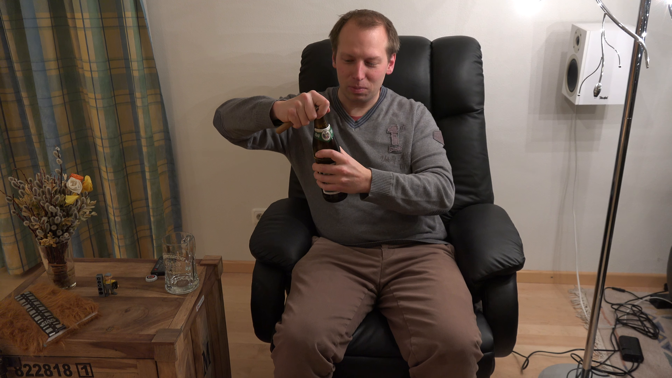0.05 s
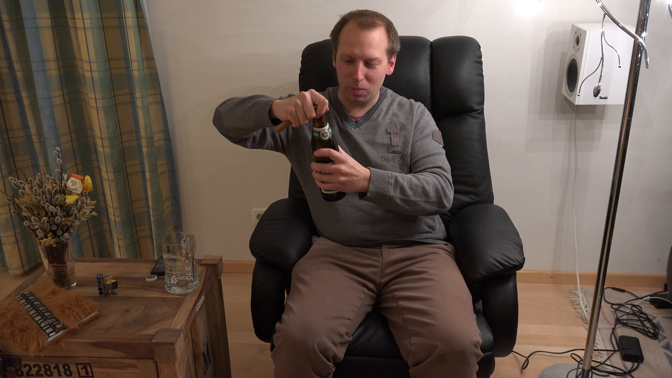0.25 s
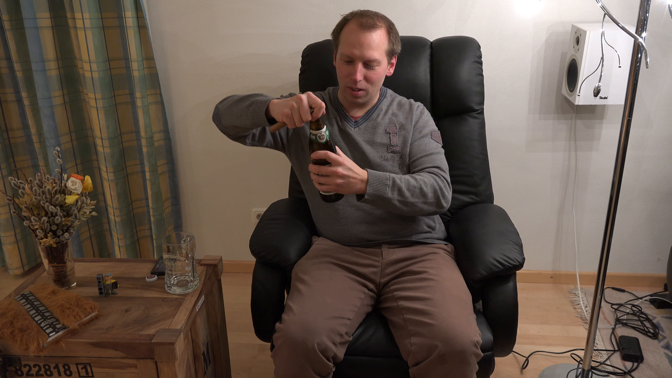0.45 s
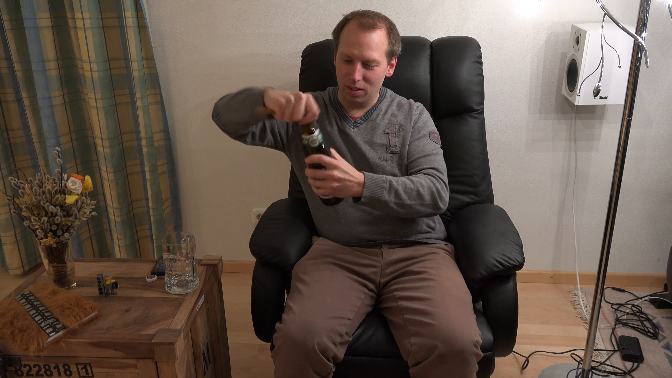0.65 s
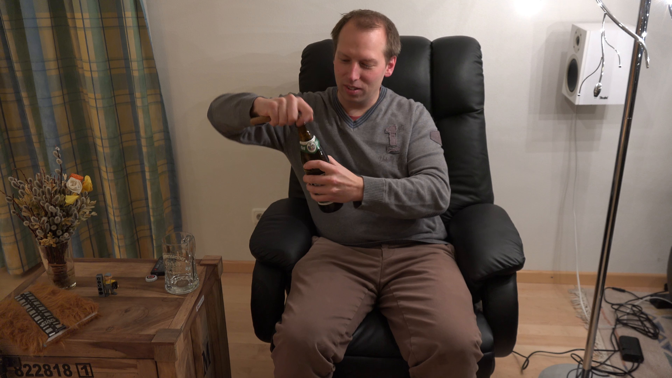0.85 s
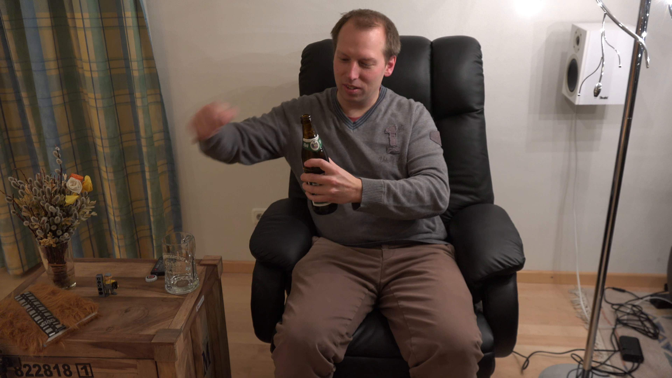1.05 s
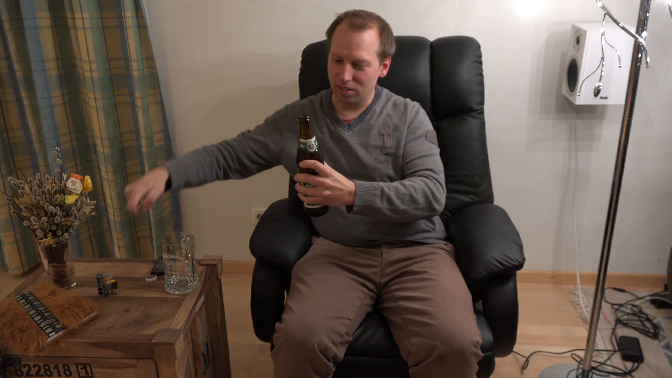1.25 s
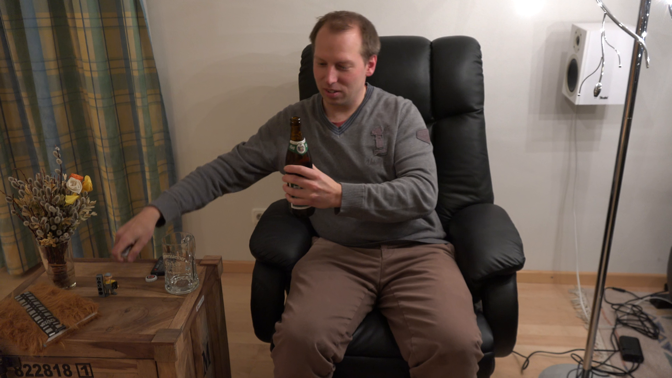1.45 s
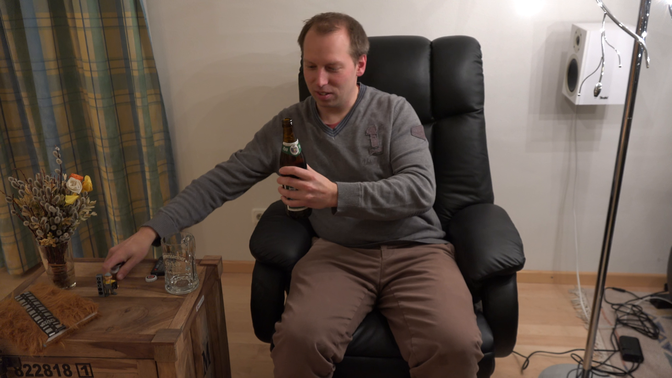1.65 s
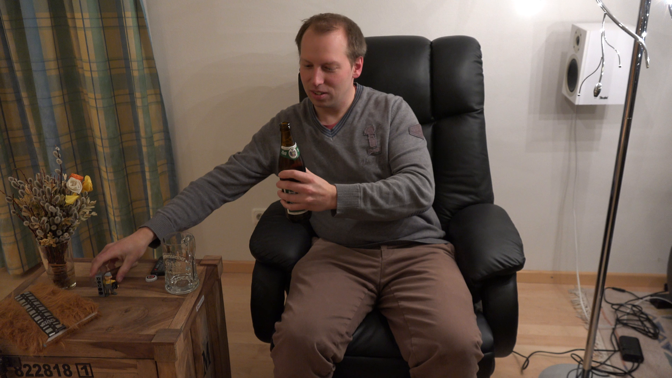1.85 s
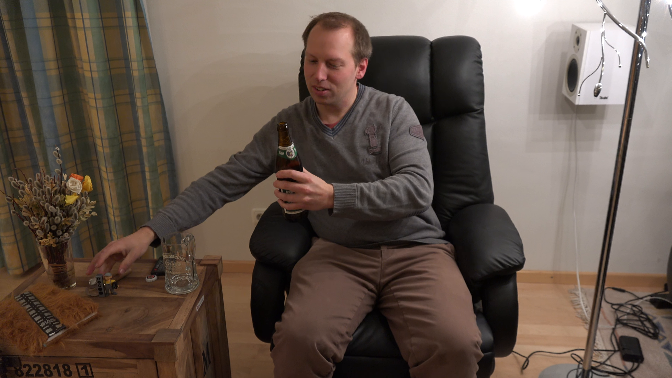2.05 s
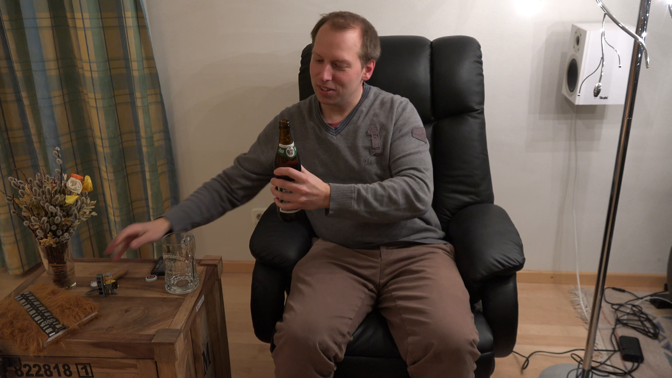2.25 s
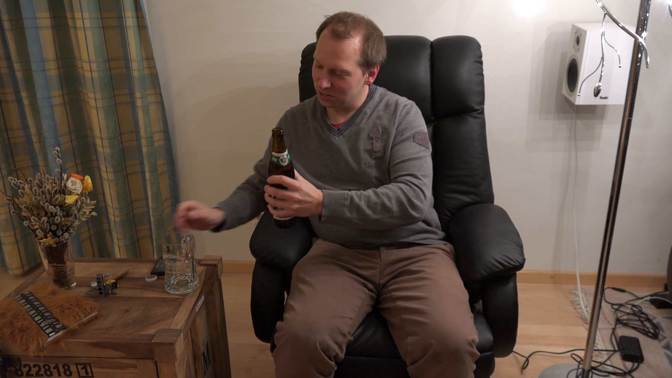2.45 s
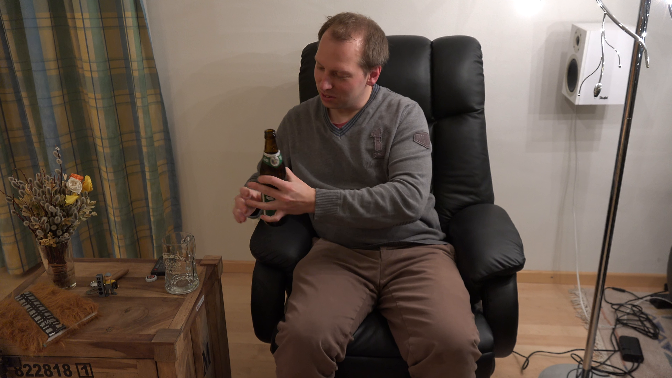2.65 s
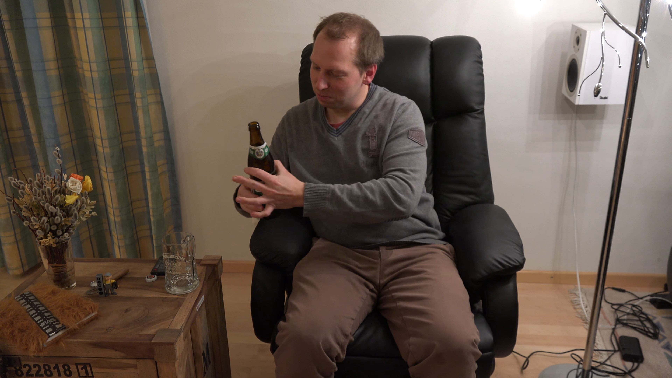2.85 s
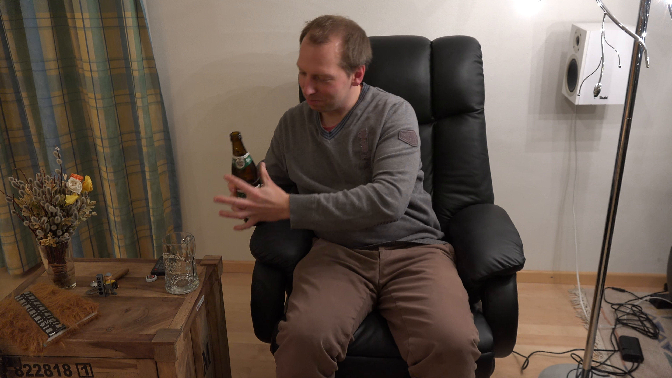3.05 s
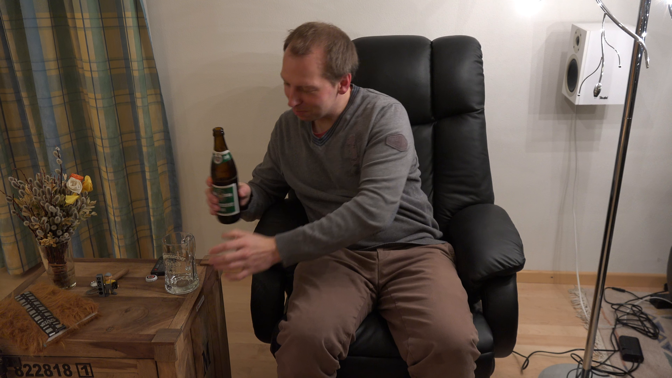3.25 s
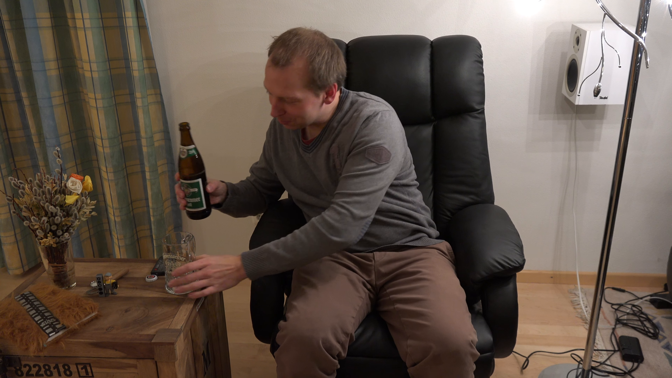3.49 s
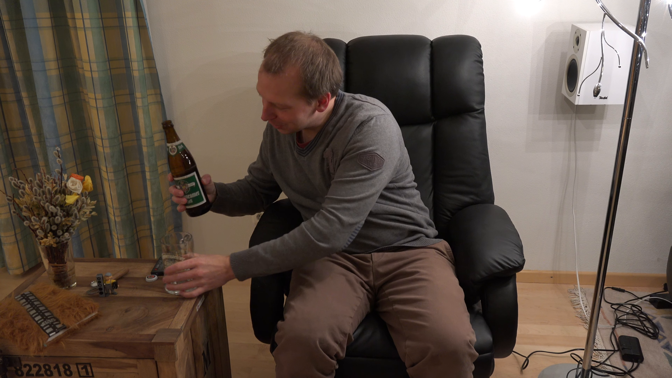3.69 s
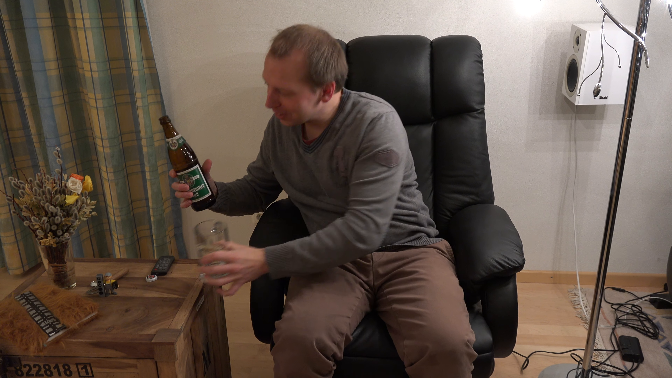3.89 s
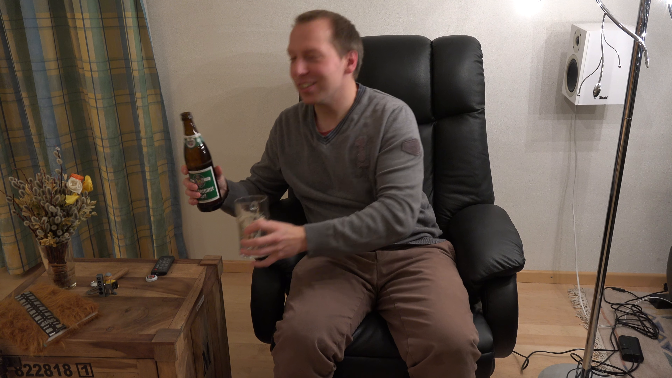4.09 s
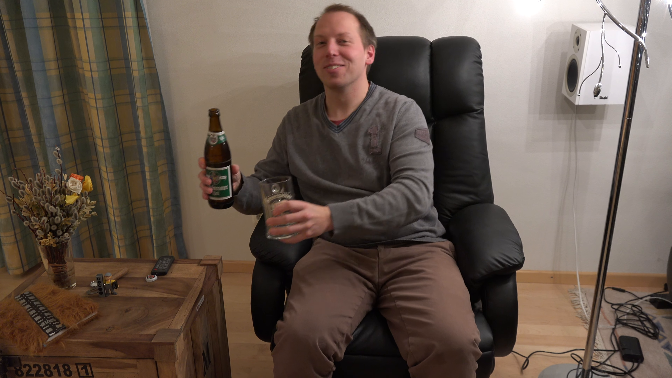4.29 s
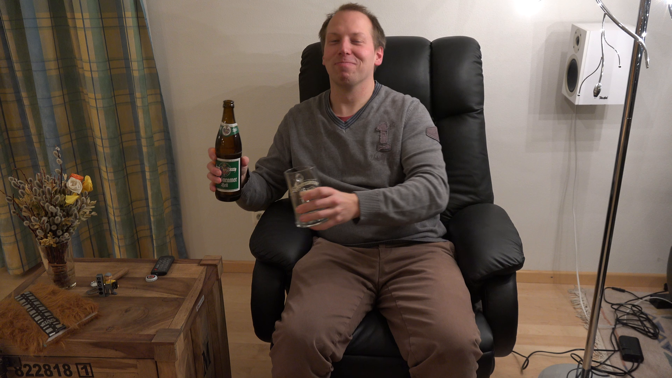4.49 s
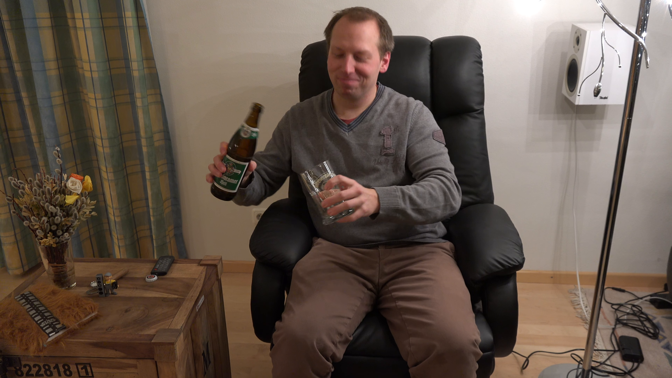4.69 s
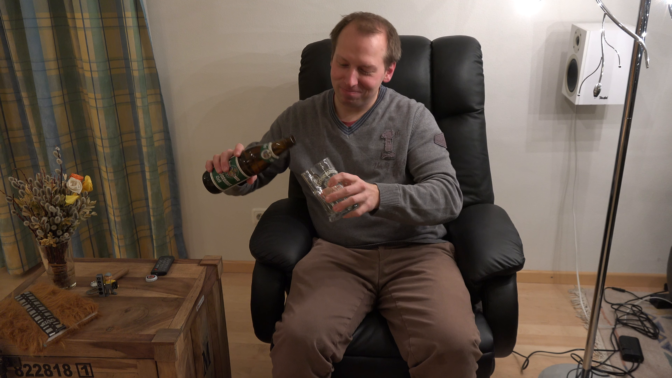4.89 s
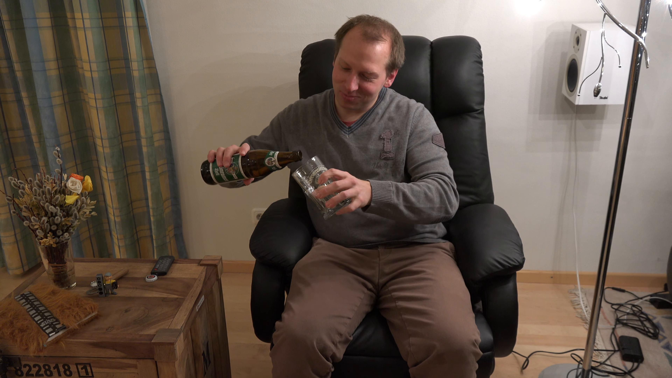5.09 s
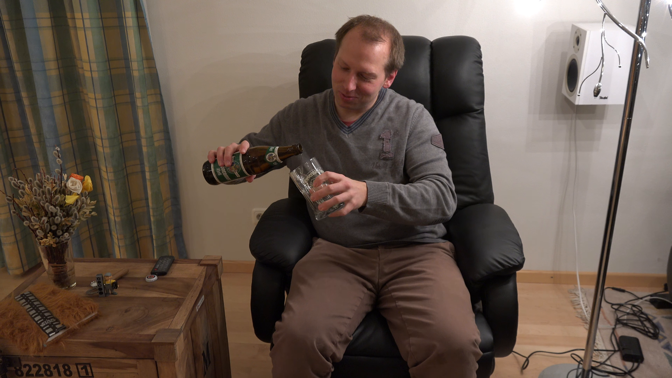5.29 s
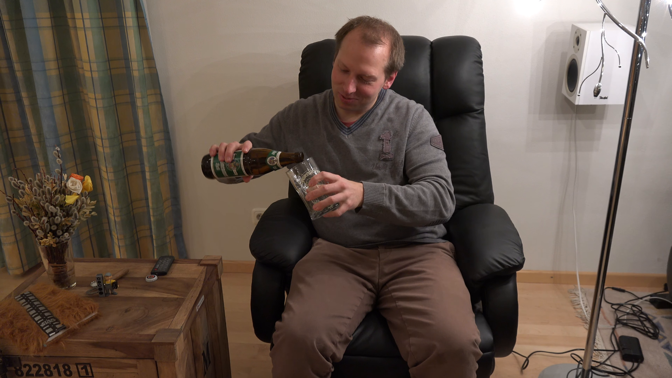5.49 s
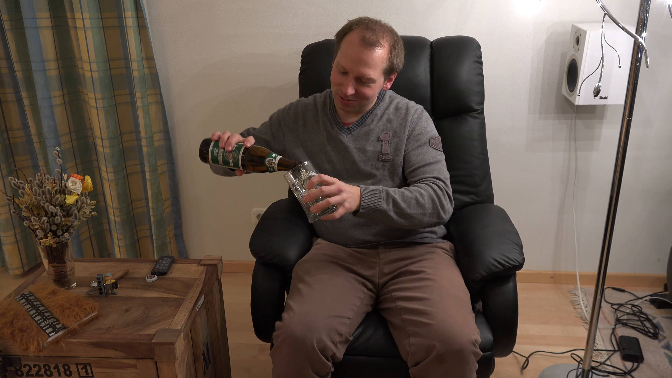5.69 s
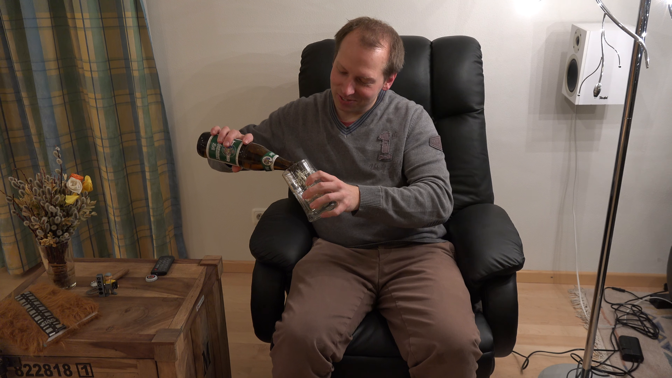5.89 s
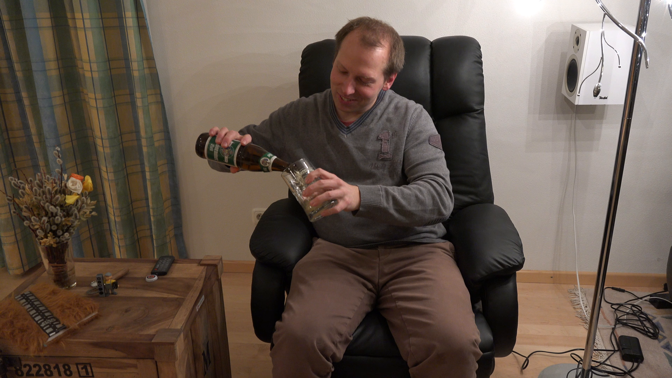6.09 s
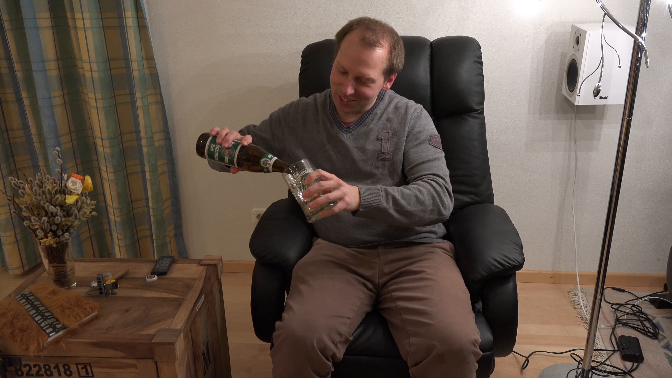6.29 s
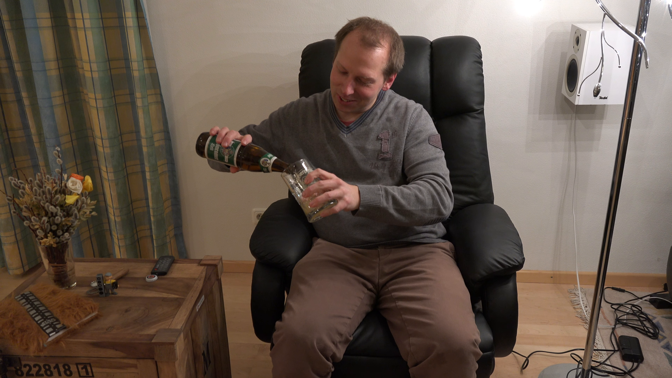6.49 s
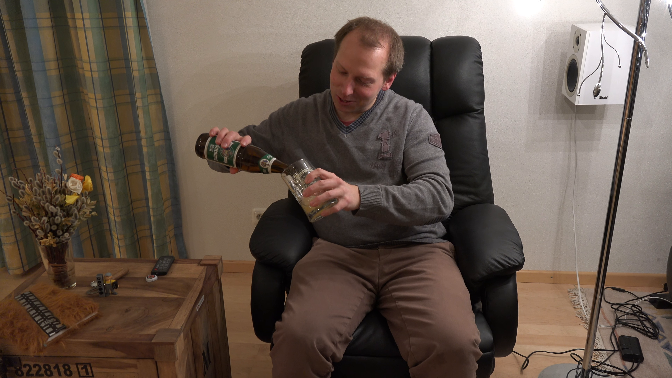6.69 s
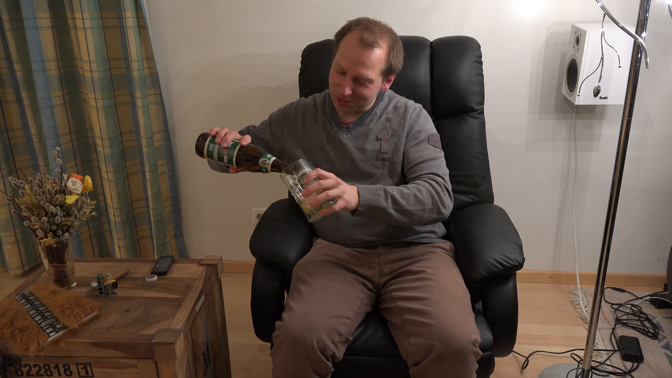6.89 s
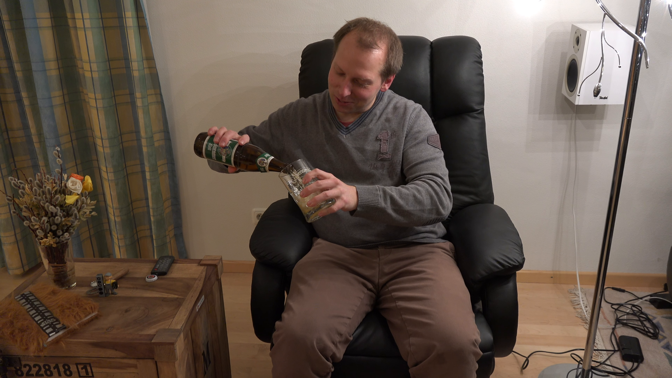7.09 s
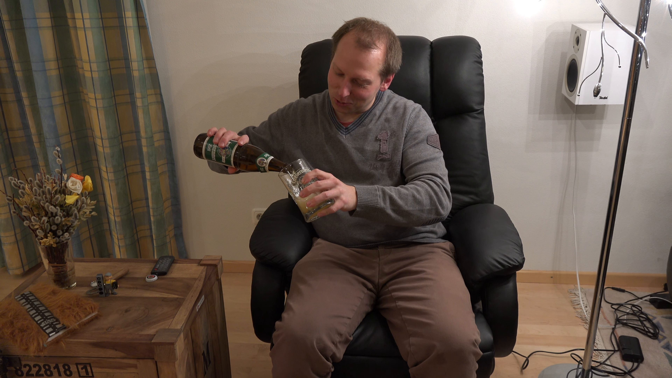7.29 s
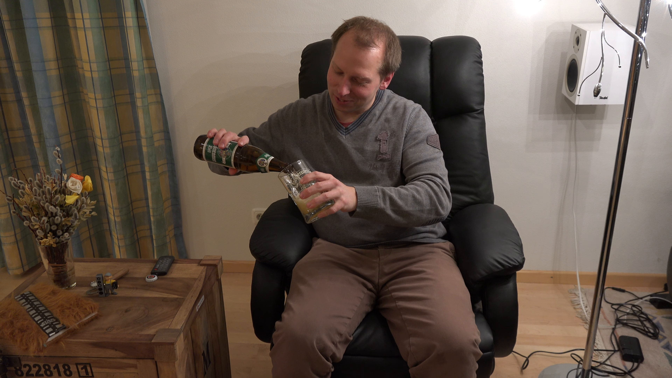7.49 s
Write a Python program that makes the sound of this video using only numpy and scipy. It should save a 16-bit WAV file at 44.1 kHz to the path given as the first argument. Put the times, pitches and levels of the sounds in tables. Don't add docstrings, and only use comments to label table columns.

```python
import sys
import numpy as np
from scipy import signal
from scipy.fft import rfft, irfft
from scipy.io import wavfile
from scipy.ndimage import uniform_filter1d, minimum_filter1d

SR = 44100
rng = np.random.default_rng(int(sys.argv[2]) if len(sys.argv) > 2 else 0)


def invert_db(x):
    u = np.asarray(x, float) / 20
    return 10 ** u


def put_to_file(sound):
    columns = np.atleast_2d(sound).T
    safe = np.clip(columns, -1, 1)
    whole_steps = np.round(safe * 32767)
    wavfile.write(sys.argv[1], SR, whole_steps.astype(np.int16))


N = 332910


def unit(x):
    return x / np.sqrt(np.mean(x ** 2) + 1e-30)


def noise():
    return rng.standard_normal(N)


def coloured(x, spectrum):
    hz, db = np.transpose(spectrum)
    f = np.maximum(np.arange(len(x) // 2 + 1) * SR / len(x), 1)
    gain = invert_db(np.interp(np.log(f), np.log(hz), db))
    return irfft(rfft(x) * gain, len(x))


def resonate(x, peaks):
    out = 0
    for hz, width_hz, db in peaks:
        b, a = signal.iirpeak(hz, hz / width_hz, fs=SR)
        once = signal.lfilter(b, a, x)
        out = out + invert_db(db) * signal.lfilter(b, a, once)
    return out


def ring(modes, scatter_db=0., length_s=.4, rise_s=0.00014):
    t = np.arange(int(length_s * SR)) / SR
    chance = rng.standard_normal((len(modes), 2))
    out = np.zeros(len(t))
    for (hz, db, t60_s), (level, phase) in zip(modes, chance):
        decay = invert_db(db + scatter_db * level - 60 * t / max(t60_s, .002))
        out += decay * np.sin(2 * np.pi * hz * t + 3 * phase)
    out *= np.sin(np.pi / 2 * np.minimum(t / rise_s, 1)) ** 2
    return out / np.max(np.abs(out))


def crack(t60_s, lo_hz, hi_hz, length_s=.1):
    t = np.arange(int(length_s * SR)) / SR
    band = signal.butter(3, [lo_hz, min(hi_hz, 20000)], "bandpass", fs=SR, output="sos")
    out = signal.sosfilt(band, rng.standard_normal(len(t)) * invert_db(-60 * t / t60_s))
    return out / np.max(np.abs(out))


def damped(x, stop_s, fall_db_s):
    return x * invert_db(-fall_db_s * np.maximum(np.arange(len(x)) / SR - stop_s, 0))


def highpass(x, hz):
    return signal.sosfilt(signal.butter(2, hz, "highpass", fs=SR, output="sos"), x)


def add(out, s, x):
    i = int(s * SR)
    out[i:i + len(x)] += x[:N - i]


def curve(rows):
    s, *columns = np.transpose(rows)
    t = np.arange(N) / SR
    gate = uniform_filter1d(1. * ((t > s[0]) & (t < s[-1])), SR // 100)
    return [np.interp(t, s, c) for c in columns] + [gate]


# frequency in Hz, density in dB per Hz.
ROOM_TONE = [(12, -60), (20, -35), (66, -2), (112, -6), (211, -5.5), (505, -17), (658, -18.5), (731, -21.5),
             (2610, -30.5), (3310, -30), (4540, -29.5), (8570, -31.5), (11200, -37.5), (14500, -78),
             (22000, -120)]


def room_tone():
    return invert_db(-59) * unit(coloured(noise(), ROOM_TONE))


# octave centre in Hz, t60 in s, level in dB re direct.
REVERB = [(126, 0.5, -4.5), (234, 0.73, -2), (487, 0.62, -7), (1000, 0.51, -8.5), (1750, 0.78, -7.5),
          (3690, 0.5, -6), (8900, 0.48, -9.5)]


def room(x):
    side_db = -34
    t = np.arange(int(1.2 * SR)) / SR
    onset = np.clip((t - .003) / 0.0093, 0, 1)
    tails = 0
    for hz, t60_s, db in REVERB:
        band = signal.butter(2, [hz / np.sqrt(2), hz * np.sqrt(2)], "bandpass", fs=SR, output="sos")
        tail = rng.standard_normal((2, len(t))) * invert_db(-60 * t / t60_s) * onset
        tail = tail / np.sqrt(np.sum(tail[0] ** 2))
        tails = tails + invert_db(db) * signal.sosfilt(band, tail)
    mid, side = signal.fftconvolve(x[None], tails, axes=1)[:, :N]
    return x + mid + invert_db(side_db) * side * np.array([[1], [-1]])


def grains(rate_hz, spread_db):
    chance = rng.random((3, N))
    clicks = (chance[0] < rate_hz / SR) * np.sign(chance[1] - .5)
    return clicks * invert_db(-spread_db * np.log(chance[2] + 1e-4))


def shift(rise_s, hold_s, release_db_s):
    t = np.arange(int(1.6 * SR)) / SR
    swell_db = 13 * np.minimum(t / rise_s - 1, 0)
    return invert_db(swell_db - release_db_s * np.maximum(t - rise_s - hold_s, 0))


# frequency in Hz, width in Hz, level in dB.
LEATHER = [(105.1, 180, 3), (179, 190, -0.5), (268, 160, 1.5), (511.7, 76, 4.5), (737, 230, 4.5)]
GRAIN = [(1888, 90, 3), (1063, 90, -1.5), (2430, 180, -6.5), (2670, 360, -2), (3490, 920, -0.5),
         (3720, 260, -6.5), (4164, 710, -4.5), (5267, 640, -5.5), (6370, 500, -6.5), (9100, 1700, -17.5)]
CLOTH = [(1340, 1800, 0)]
# start in s, rise in s, hold in s, leather in dB, skin grain in dB re leather.
SHIFTS = [(0.844, 0.072, 0.68, -63.5, -16), (1.223, 0.039, 0.077, -53, -7), (1.41, 0.013, 0.042, -52, -22),
          (1.47, 0.018, 0.72, -49.5, -6), (2.208, 0.042, 0.28, -52.5, -6),
          (2.562, 0.052, 0.097, -60.5, 1.5), (2.75, 0.062, 0.17, -60.5, -10),
          (2.988, 0.011, 0.39, -47, -23), (3.151, 0.0081, 0.19, -37.5, -3), (3.438, 0.022, 0.016, -42, -30),
          (3.559, 0.018, 0.11, -39, -7.5), (3.847, 0.12, 0.15, -46.5, -11.5),
          (4.156, 0.049, 0.1, -39.5, -17.5), (4.574, 0.034, 0.039, -55.5, -6),
          (4.67, 0.024, 0.1, -37.5, -5)]
# time in s, peak in dB, treble in dB re peak.
KNOCKS = [(0.925, -42.5, -14.5), (1.254, -32.5, -16), (1.418, -30.5, -28.5), (1.478, -35.5, -23.5),
          (1.518, -37, -10), (2.992, -41, 1), (3.062, -34, -10.5), (3.096, -29.5, -14.5),
          (3.381, -30, -2.5), (3.449, -29, 1), (3.459, -30, -20), (3.557, -27.5, -1.5), (3.596, -28.5, 0.5),
          (3.626, -28, -4.5), (4.205, -27, -18), (4.279, -30, -9.5), (4.298, -37, -22), (4.31, -31.5, -20),
          (4.726, -35, -13)]
# frequency in Hz, level in dB, t60 in s.
FRAME = [(220.4, -6, 0.062), (314, 8.5, 0.013), (460, -5.5, 0.022), (610, -9, 0.076), (760, -7, 0.014),
         (1030, 0.5, 0.012)]
# time in s, slip rate in Hz, level in dB.
SQUEAK = [(4.175, 962, -62), (4.19, 975, -44), (4.21, 983, -44.5), (4.235, 983, -48), (4.26, 992, -54),
          (4.29, 990, -47.5), (4.33, 983, -55), (4.39, 975, -68)]


def chair():
    jerks_hz, jerk_db, cloth_db = 40, 1.2, -4.5
    slips = unit(grains(800, spread_db=2.0)) + .5 * noise()
    skin = unit(resonate(slips, GRAIN))
    cloth = unit(resonate(noise(), CLOTH))
    body = unit(resonate(slips, LEATHER)) + invert_db(cloth_db) * cloth
    grip = invert_db(jerk_db * unit(uniform_filter1d(noise(), int(SR / jerks_hz))))
    out, jolts = np.zeros(N), np.zeros(N)
    for s, rise_s, hold_s, db, skin_db in SHIFTS:
        body_gain = shift(rise_s, hold_s, release_db_s=102.5)
        skin_gain = shift(rise_s, hold_s, release_db_s=189.5)
        now = slice(int(s * SR), int(s * SR) + len(body_gain))
        rub = body_gain * body[now] + skin_gain * invert_db(skin_db) * skin[now]
        add(out, s, grip[now] * invert_db(db - 5.5) * rub)
    for s, db, treble_db in KNOCKS:
        add(out, s, invert_db(db) * ring(FRAME, 2.5, length_s=.15, rise_s=0.0028))
        add(jolts, s, invert_db(db + treble_db + 11.5) * crack(0.073, 1000, 11000))
    slip_hz, db, gate = curve(SQUEAK)
    wobble = 1 + .03 * unit(uniform_filter1d(noise(), SR // 300))
    phase = 2 * np.pi * np.cumsum(slip_hz * wobble) / SR
    for k, part_db in enumerate([1.5, -1, -6.5, -13, -18], 1):
        out += gate * invert_db(db + part_db) * np.sin(k * phase)
    return highpass(out + resonate(jolts, GRAIN), 62)


# frequency in Hz, density in dB per Hz.
GAS = [(470, -46), (800, -9.5), (1990, -2), (2590, 0.5), (3150, 4), (3840, 0), (6720, 7.5), (11000, -3.5),
       (14300, -59.5), (22000, -120)]
# time in s, peak in dB, pitch in Hz.
TICKS = [(0.11, -42, 4680), (0.2494, -62, 2110), (0.332, -48.5, 4900), (0.351, -49, 4870),
         (0.383, -41.5, 8900), (0.388, -49.5, 1495), (0.393, -46, 3200), (0.396, -44, 4260),
         (0.512, -57, 1260), (0.924, -51, 2636), (1.044, -50.5, 3297), (1.211, -49, 7180),
         (1.2992, -33.5, 3776), (1.308, -37, 4167), (1.332, -28.5, 4160), (1.356, -51, 4483),
         (1.3655, -48, 4770), (1.377, -50.5, 1618), (1.253, -46, 2021), (1.417, -47, 2000),
         (1.477, -45, 1484), (1.334, -44.5, 4700), (0.398, -49, 7500), (1.612, -43, 2194),
         (5.028, -49, 7400), (5.028, -51, 3300), (5.93, -47, 9000), (5.941, -45, 8600), (5.975, -49, 8560),
         (5.983, -44, 6430), (6.577, -44.5, 7360), (6.578, -62, 1465), (7.1124, -48.5, 2170)]
# frequency in Hz, level in dB, t60 in s.
NECK = [(526, -9, 0.12), (465, -15.5, 0.048), (602, -16, 0.048), (3900, 1.5, 0.011), (3580, -5.5, 0.011),
        (5790, -5, 0.009)]


def bottle():
    gas_db = -37 - 152 * np.arange(N) / SR
    out = invert_db(gas_db) * unit(coloured(noise(), GAS))
    for s, db, hz in TICKS:
        add(out, s, invert_db(db) * crack(55 / hz, .86 * hz, 1.16 * hz))
        add(out, s, invert_db(db - 10.0) * crack(0.0055, .45 * hz, 3.3 * hz))
    pop_s = .5515
    neck = ring(NECK, rise_s=0.0035)
    add(out, pop_s, invert_db(-24.5) * damped(neck, 0.0111, fall_db_s=2977.5))
    add(out, pop_s, invert_db(-32) * crack(0.043, 870, 3840))
    add(out, pop_s, invert_db(-39) * crack(0.21, 600, 2100, length_s=.2))
    add(out, pop_s - .0045, invert_db(-52) * crack(0.061, 1500, 9000))
    add(out, pop_s, invert_db(-30.5) * crack(0.11, 2600, 7500))
    return out


# time in s, peak in dB, t60 in s, splash click in dB re peak.
GLUGS = [
    (5.58, -28.5, 0.072, -1.5),
    (5.759, -42, 0.055, -19),
    (6.04, -38.5, 0.038, -6),
    (6.325, -37, 0.036, -2.5),
    (6.662, -46.5, 0.035, -3),
    (7.014, -45, 0.032, -10),
    (7.381, -42, 0.032, -15),
]
# frequency in Hz, level in dB, t60 as a share of the gulp's.
MUG = [(975, 5.5, 0.33), (1270, 6, 0.36), (1850, 9, 0.85), (2350, -4, 0.43), (2400, 6, 0.41),
       (2500, 4, 0.6), (2840, 2, 0.43), (3250, 4, 0.49), (3610, -1.5, 0.9), (4300, -10, .4),
       (4560, 2, 0.54)]


def glugs():
    slap = [(155, -9.5, 0.017), (282, -4.5, 0.011), (493, -9.5, 0.017)]  # (Hz, dB, t60 s)
    out = np.zeros(N)
    for s, db, t60_s, click_db in GLUGS:
        hz = air_column(s)[0]
        air = [(hz, 0, t60_s), (0.827 * hz, -8, t60_s / 2)]
        glass = [(f, g, share * t60_s) for f, g, share in MUG]
        add(out, s, invert_db(db) * ring(air, length_s=.25, rise_s=0.14 * t60_s))
        add(out, s, invert_db(-40) * ring(slap, length_s=.1, rise_s=0.00099))
        add(out, s, invert_db(db + click_db + 4.0) * ring(glass, 1.25, length_s=.2, rise_s=0.00066))
        add(out, s, invert_db(db + click_db - 3) * crack(0.035, 980, 6500))
    return out


# time in s, peak in dB, pitch in Hz.
PLINKS = [(5.76, -33.5, 3100), (5.828, -32, 3370), (5.828, -33, 3770), (5.85, -51, 3320),
          (5.872, -44, 3640), (5.897, -42, 3250), (5.908, -30.5, 2750), (5.9404, -41.5, 2670),
          (5.986, -42, 2670), (6.102, -34, 2730), (6.1373, -32.5, 3140), (6.116, -39, 3480),
          (6.151, -45, 3150), (6.168, -46, 3300), (6.187, -50, 3060), (6.205, -55, 3250),
          (6.228, -54, 3170), (6.075, -54, 2600), (6.356, -41, 3210), (6.401, -45, 3460),
          (6.5143, -48, 2060), (6.524, -52, 2160), (6.534, -54, 2220), (6.599, -46, 2780),
          (6.911, -48.5, 3130), (6.9348, -41, 3100), (6.93, -51.5, 2500), (6.94, -47, 5520),
          (6.662, -42, 4700), (7.0155, -42.5, 4730), (7.383, -44, 4500), (6.046, -55, 2400),
          (6.058, -52, 3030), (6.084, -49, 2240), (6.125, -42, 2000), (6.19, -42, 2000),
          (5.831, -39, 1760), (5.988, -45, 1400), (6.02, -52, 1110), (6.072, -43, 1880),
              (6.101, -41, 1340), (6.112, -46, 1520), (6.13, -51, 1160), (6.148, -45, 910),
              (6.16, -42, 820), (6.183, -42, 825), (6.172, -43, 875), (6.194, -34, 782), (6.383, -40, 715),
              (6.61, -49, 614), (6.698, -44.5, 698), (7.21, -44.5, 2740), (6.04, -44, 524),
              (6.325, -43, 503), (7.325, -48.5, 818)]
# time in s, peak in dB, centre in Hz.
SPATTER = [(5.833, -35.5, 6150), (6.038, -39.5, 4100), (6.041, -46, 4700), (6.052, -44, 3600),
           (6.064, -53, 2100), (6.072, -43, 1730), (6.089, -48, 4300), (6.325, -44, 4300),
           (6.334, -43, 4600), (6.337, -46, 5440), (6.357, -49, 4300), (6.381, -47, 4460),
           (6.434, -51, 3900), (6.455, -51.5, 4070), (6.577, -56, 4300), (6.588, -51, 3910),
           (6.611, -46, 4700), (6.662, -43.5, 4600), (6.6963, -49, 4450), (7.0148, -46, 4770),
           (7.382, -48, 4530)]


def drops():
    out = np.zeros(N)
    for s, db, hz in PLINKS:
        t60_s = 0.055 * (1000 / hz) ** 0.52
        click_db = -20.5 + 5.5 * np.log2(hz / 1000)
        bubble = [(hz, 0, t60_s), (0.922 * hz, -9, t60_s / 2), (1.076 * hz, -9, t60_s / 2)]
        wall = crack(5.9 * t60_s, 0.898 * hz, 1.065 * hz, length_s=.2)
        add(out, s, invert_db(db - 6.0) * ring(bubble, length_s=.15, rise_s=0.00097))
        add(out, s, invert_db(db + click_db - 2.0) * crack(0.025, 0.843 * hz, 1.63 * hz))
        add(out, s, invert_db(db - 17.0) * wall)
    for s, db, hz in SPATTER:
        add(out, s, invert_db(db) * crack(0.018, 0.918 * hz, 1.12 * hz))
        add(out, s, invert_db(db - 4.5) * crack(0.0073, .5 * hz, 2.5 * hz))
    return out


# frequency in Hz, level in dB, t60 in s.
RIM = [(6430, -4.5, 0.22), (6560, -3.5, 0.096), (7230, -10.5, 0.042), (6150, -4, 0.014)]


def clink():
    out, s = np.zeros(N), 7.2145
    add(out, s, invert_db(-36) * ring(RIM, length_s=0.18))
    add(out, s, invert_db(-39) * crack(0.033, 4600, 10000))
    return out


# time in s, splash in dB.
STREAM = [(5.56, -64), (5.82, -67), (5.97, -56), (6.03, -53.5), (6.05, -58), (6.09, -49.5), (6.14, -52),
          (6.21, -63.5), (6.29, -69), (6.33, -52), (6.41, -59.5), (6.5, -77), (6.57, -65), (6.7, -58),
          (6.85, -69), (7.1, -61), (7.549, -66)]
# frequency in Hz, density in dB per Hz.
SPLASH = [(590, -29), (1000, -8), (1450, -7), (1880, 10), (2300, -41), (2620, 9), (3200, 12.5), (9180, -4),
          (11000, -9), (14300, -58), (22000, -120)]


def air_column(s):
    surge = np.exp(-((s - 6.185) / 0.048) ** 2)
    return 605 + 78 * (s - STREAM[0][0]) + 89.8 * surge, surge


def bubbles(count):
    out, t = np.zeros(N), np.arange(SR // 40) / SR
    start_s, end_s = STREAM[0][0], STREAM[-1][0]
    for when, size, loud in rng.random((count, 3)):
        hz = 900 * 5.6 ** size
        fade = np.exp(-t * hz / 7) * np.minimum(t / 0.00016, 1)
        chirp = np.sin(2 * np.pi * hz * t * (1 + 6 * t)) * fade
        add(out, start_s + when * (end_s - start_s), invert_db(-3 * np.log(loud + 0.0042)) * chirp)
    return unit(out) / 2


def stream():
    splash_db, gate = curve(STREAM)
    air_hz, surge = air_column(np.arange(N) / SR)
    splash = bubbles(count=2500) + .8 * unit(coloured(noise(), SPLASH))
    slosh = uniform_filter1d(rng.standard_normal((2, N)), SR // 160, axis=1)
    phase = 2 * np.pi * np.cumsum(air_hz) / SR
    air = unit(slosh[0] * np.sin(phase) + slosh[1] * np.cos(phase))
    air_db = splash_db - 16.5 + 26 * surge
    return gate * (invert_db(splash_db - 8.5) * splash + invert_db(air_db) * air)


def pour():
    return glugs() + drops() + clink() + stream()


# time in s, peak in dB, contact centre in Hz, lid thud in dB re peak.
THUDS = [(1.684, -32.5, 2500, -8), (1.6887, -16, 1832, -10.5), (1.6955, -22, 1500, -5.5),
         (1.715, -16, 2992, -6), (1.726, -22, 799.4, -1), (1.7678, -20.5, 3155, -11.5),
         (1.7815, -24, 3015, -16), (1.8095, -4.5, 1380, -11.5), (1.8164, -12.5, 1480, -12.5),
         (1.838, -12, 2108, -8), (1.860, 0.5, 2260, -20), (1.8643, -6.5, 2657, -13),
         (1.8759, -3.5, 1980, -4), (1.8816, -13.5, 1200, -3), (1.8967, -11, 2500, -5.5),
         (1.9139, -18, 1000, -0.5), (1.9591, -20, 2400, -13), (2.0209, -24, 3020, -9),
         (2.036, -24.5, 2620, -11), (2.1722, -22, 2250, -30), (2.216, -30.5, 2000, -22)]
# frequency in Hz, level in dB, t60 in s.
WOOD = [(895, -2, .06), (1200, 1, .1), (1456, 0.5, 0.12), (1495, 0, 0.093), (1720, 0.5, 0.081),
        (1940, -9, 0.065), (2140, -2.5, 0.076), (2130, -7, 0.055), (2505, -4, 0.051), (2820, -5, 0.067),
        (2897, -4, 0.1), (3250, -7.5, 0.047), (3370, -9.5, .05), (3900, -9.5, 0.11)]
LID = [(184.8, -8.5, 0.1), (225.8, -3.5, 0.081), (345, -2, 0.057), (520, 0, 0.043), (637, -2, 0.065),
       (715, 0.5, 0.072), (744.6, -4.5, 0.16)]
# time in s, then bar, hook, high modes and click, all in dB.
RINGS = [(1.605, -46, -61, -65.5, -55), (1.619, -43, -63.5, -61, -48.5), (1.6952, -24, -38, -28.5, -29.5),
         (1.7141, -28.5, -21, -19, -25), (1.7676, -14, -30.5, -12.5, -10.5),
         (1.7817, -22.5, -36.5, -24.5, -19), (1.803, -23.5, -51, -37.5, -45.5),
         (1.860, -41.5, -40, -41, -20), (1.8758, -44.5, -32.5, -28.5, -19.5), (1.898, -41, -50, -42, -25.5),
         (1.9144, -52.5, -52.5, -33, -27), (1.96, -31.5, -40, -39, -27.5), (2.0205, -17, -39, -48.5, -26),
         (2.038, -26.5, -31, -49, -33.5), (2.1721, -33.5, -27, -39, -31)]
# frequency in Hz, level in dB, t60 in s.
BAR = [(4753, -3.5, 0.4), (4870, -12.5, .15), (4680, -15, 0.3), (4450, -21, 0.26), (4580, -0.5, 0.027),
       (4860, -3, 0.044)]
HOOK = [(6700, -6.5, 0.09), (6910, -1.5, 0.041), (7200, -14.5, 0.05), (6525, -17.5, 0.05),
        (7600, -20.5, 0.03)]
HIGH = [(9060, -5, 0.092), (9000, -1.5, 0.04), (8870, -9.5, .06), (7960, -8, 0.056), (6300, -9.5, 0.11),
        (5920, -9, 0.046), (8330, -11, .03)]


def opener():
    out = np.zeros(N)
    for s, db, hz, lid_db in THUDS:
        blow = ring(WOOD, 3., length_s=.15, rise_s=0.00071)
        blow = signal.lfilter(*signal.iirpeak(hz, 1.3, fs=SR), blow)
        add(out, s, invert_db(db - 7.5) * blow / np.max(np.abs(blow)))
        add(out, s, invert_db(db - 9.0) * crack(0.1, 0.24 * hz, 1.6 * hz))
        add(out, s, invert_db(db) * crack(0.0034, .4 * hz, 1.7 * hz))
        add(out, s, invert_db(db + lid_db) * ring(LID, 2.5, length_s=.2, rise_s=0.0008))
    for s, bar_db, hook_db, high_db, click_db in RINGS:
        steel = invert_db(bar_db) * ring(BAR, 1.25, length_s=.5)
        steel += invert_db(hook_db) * ring(HOOK, 1.25, length_s=.5)
        steel += invert_db(high_db) * ring(HIGH, 1.25, length_s=.5)
        free_s = .09 if s < 2.0 else .45
        add(out, s, damped(steel, free_s, fall_db_s=2498.5))
        add(out, s, invert_db(click_db) * crack(0.026, 3200, 9500))
    return highpass(out, 45)


def scene():
    steel_and_wood = opener()
    left_minus_right_db = -.3
    pan = invert_db(np.array([[.5], [-.5]]) * left_minus_right_db)
    aside = steel_and_wood * (pan - 1)
    return room(bottle() + steel_and_wood + chair() + pour()) + aside + room_tone()


def starve(x):
    hz, _, z = signal.stft(x, SR, nperseg=512)
    power = np.abs(z).mean(axis=0)[:256] ** 2 + 1e-20
    power = power.reshape(64, 4, -1).mean(axis=1)
    spread = uniform_filter1d(power, size=11, axis=0)
    coming = -minimum_filter1d(-spread, size=3, origin=-1)
    centre_hz = hz[2:256:4, None]
    mask_db = -23 + 1.45 * centre_hz / 1000 + 3.5 * rng.standard_normal(power.shape)
    kept = (centre_hz < 900) | (power > coming * invert_db(2 * mask_db))
    z[:, :256] *= np.repeat(kept, 4, axis=0)
    return signal.istft(z, SR, nperseg=512)[1][:, :N]


def low_pass(x):
    return signal.sosfilt(signal.butter(12, 11320, fs=SR, output="sos"), x)


def record(dry):
    saturation, top_hz = .5, 10900
    rounded = np.tanh(dry * saturation) / saturation
    lowpass = signal.ellip(10, .2, 80, top_hz, fs=SR, output="sos")
    mix = starve(signal.sosfilt(lowpass, rounded))
    return low_pass(mix)


dry = scene()
out = record(dry)
put_to_file(out)
```